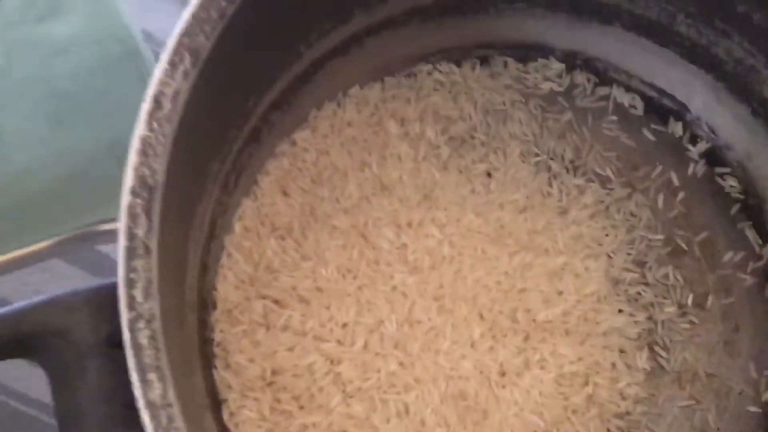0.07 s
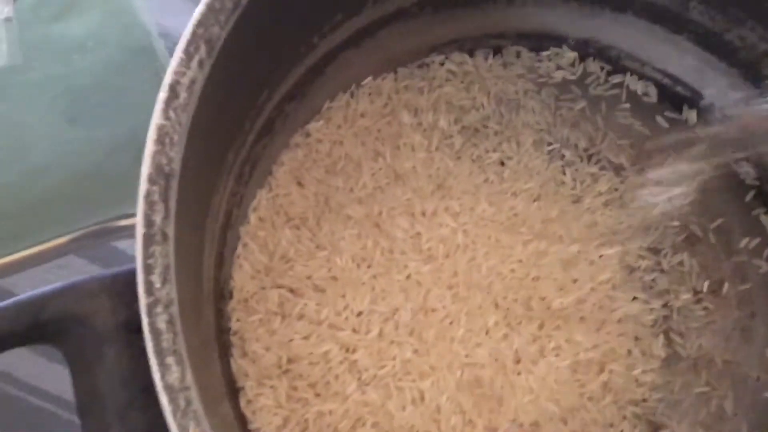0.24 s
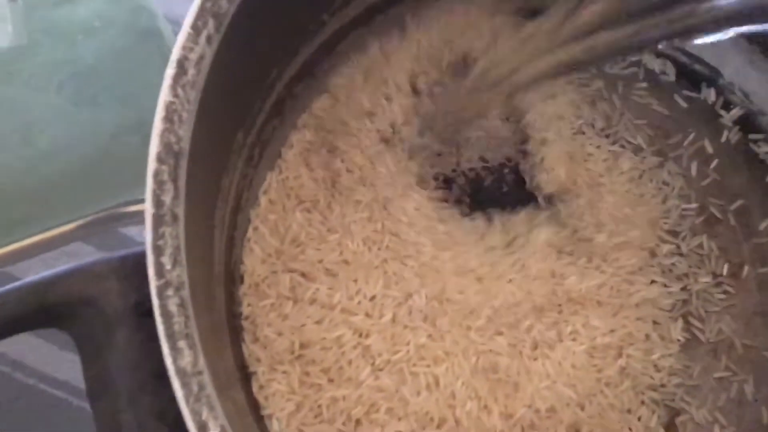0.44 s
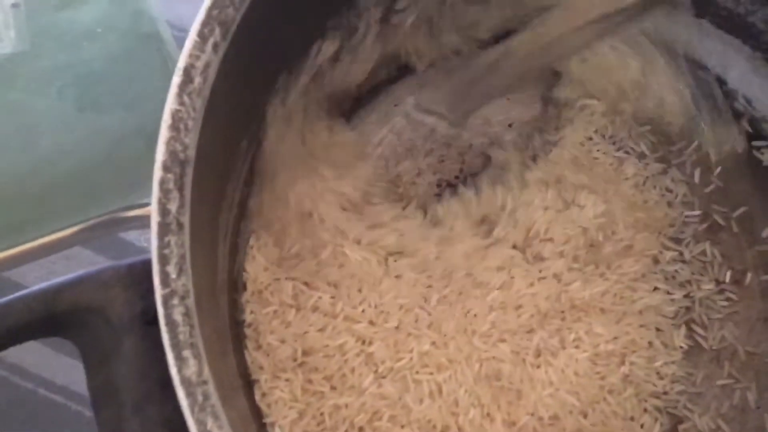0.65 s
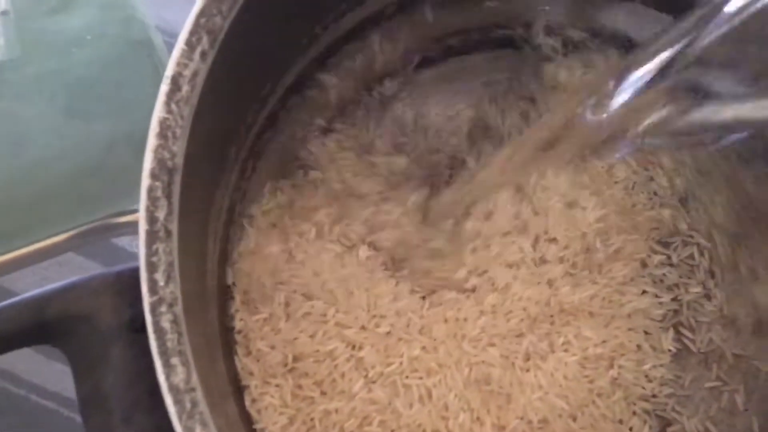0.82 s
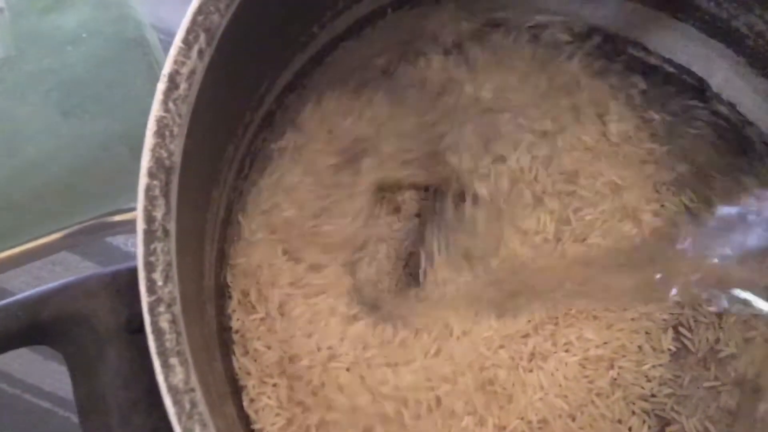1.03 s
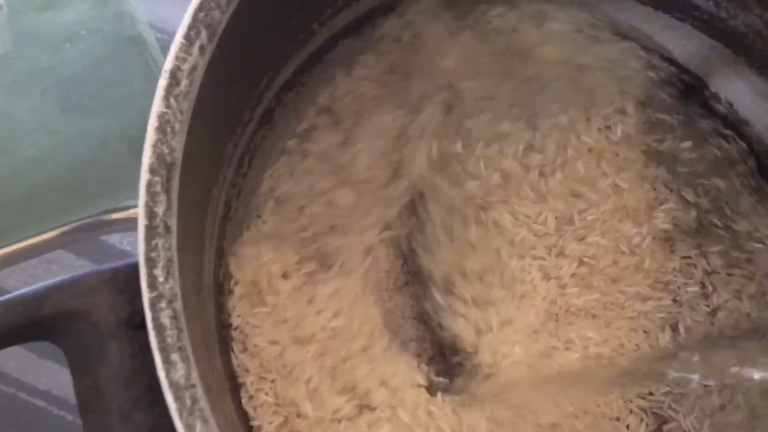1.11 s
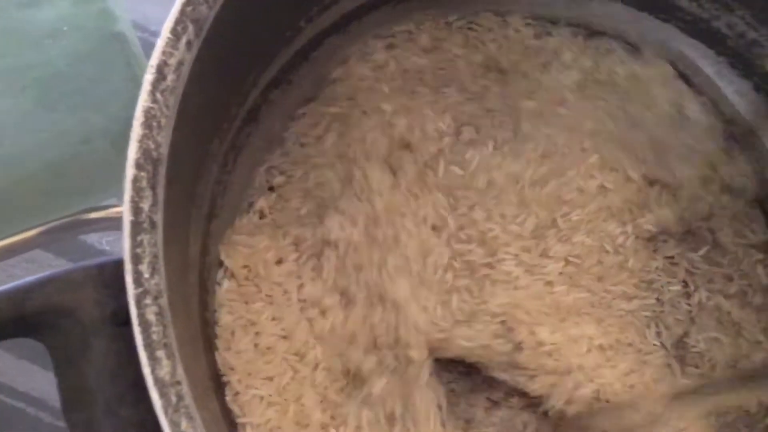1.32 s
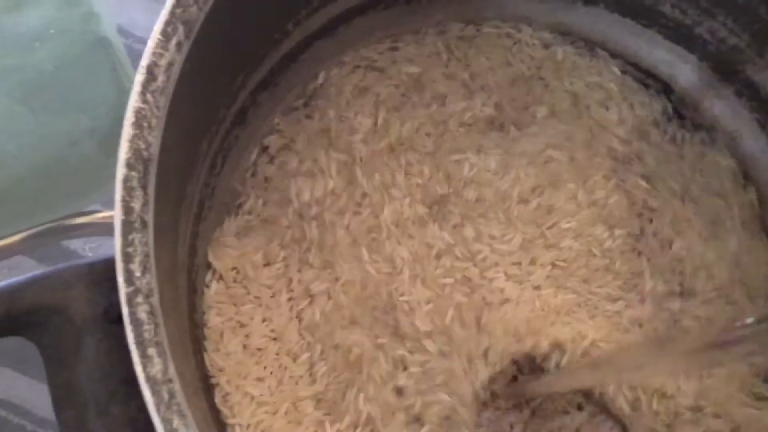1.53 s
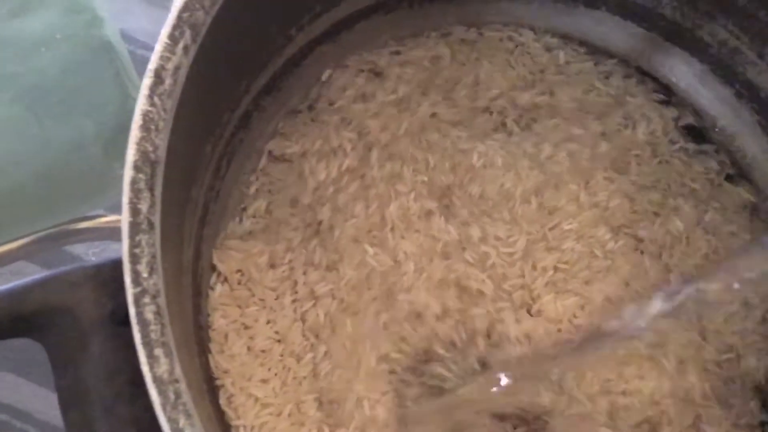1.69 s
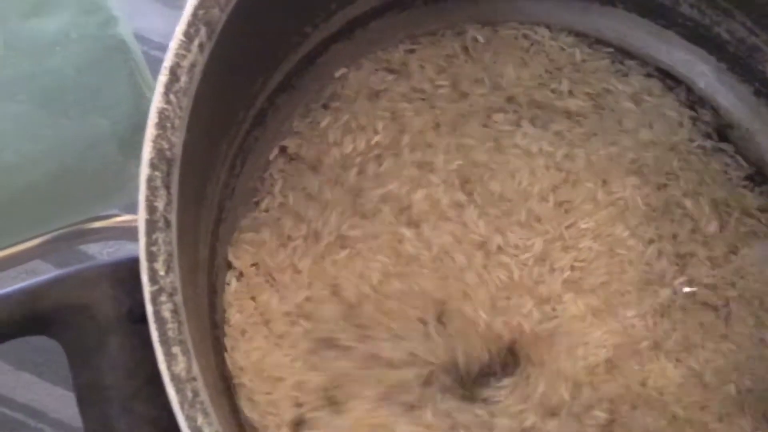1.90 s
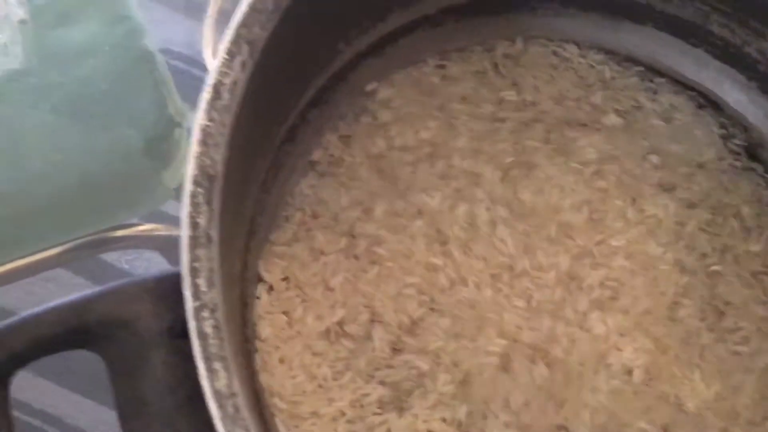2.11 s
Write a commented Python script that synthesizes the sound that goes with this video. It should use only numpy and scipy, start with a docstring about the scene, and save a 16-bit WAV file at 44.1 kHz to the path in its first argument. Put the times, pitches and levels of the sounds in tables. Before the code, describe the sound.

Water pouring onto dry rice in a metal pot, close up in a kitchen. Low appliance hum alone until 0.2 s, then a sharp sizzle on metal and bright, hissy patter, strongest around 0.3-0.6 s. It swells again near 1 s with watery slopping, thins from 1.25 s into bubbles and soft glugs, gives final plinks and drips around 1.8-1.9 s, leaving hum and very faint wet crackle.

```python
"""An appliance hums in a kitchen, made of wavering sine tones over soft filtered noise.
Water is poured onto dry rice in a metal pot close by: the first of it sizzles on bare metal (quick clicks).
It digs into the rice: clicks make patter and spray, rising tones make bubbles, and the pot rings along.
Air gulps (bands of noise), big bubbles glug (sinking tones) and water slops in the hollow (filtered clicks).
The pour thins to last drops (bursts of noise), leaving the wet rice crackling faintly (tiny clicks)."""
import sys
import numpy as np
from scipy import signal
from scipy.fft import rfft, irfft
from scipy.io import wavfile

SR = 44100
rng = np.random.default_rng(int(sys.argv[2]) if len(sys.argv) > 2 else 0)


def digitize_waveform(pressure):
    """Quantize a signal to 16-bit integers and store it at the path in sys.argv[1].

    Rows of a 2-D input are taken as channels; values are limited to [-1, 1].
    """
    field = np.atleast_2d(pressure).T
    bounded = np.clip(field, -1, 1)
    quanta = np.round(bounded * 32767).astype(np.int16)
    wavfile.write(sys.argv[1], SR, quanta)


N = 94815
T = np.arange(N) / SR

# how the pour changes, before the pot rings: time_s, patter_db, spray_db, bubbling_db
POUR = [(.216, -89, -90, -81), (0.219, -51.5, -46, -72), (0.251, -42.5, -42.5, -65),
        (.30, -39.5, -41.5, -57), (0.333, -33.5, -38.5, -43), (.40, -39.5, -39.5, -42),
        (.53, -37.5, -43, -43.5), (.61, -40, -43.5, -39.5), (.67, -44.5, -47, -41),
        (.73, -39.5, -46.5, -43.5), (.85, -39.5, -50.5, -46), (.95, -36, -40, -42.5),
        (1.12, -38, -42.5, -48.5), (1.24, -43, -48, -47.5), (1.42, -45.5, -53.5, -42),
        (1.58, -49.5, -56.5, -45), (1.73, -56, -56.5, -44), (1.822, -61, -54.5, -43.5),
        (1.87, -46.5, -67, -64), (1.92, -63.5, -69.5, -70), (2.04, -78, -78, -77)]
# tone colours of the pour, only their shape counts: pitch_hz, relative_level_db
PATTER_COLOUR = [(300, -44.5), (650, -21.5), (950, -22), (1550, -7), (2700, -5.5), (3800, -1.5),
                 (5200, -0.5), (7000, -6), (9000, -12.5), (11000, -19), (16000, -13)]
SPRAY_COLOUR = [(1000, -51), (4000, -16), (7000, 3), (9200, 7.5), (10000, 3), (13000, 2.5), (16000, -9.5)]
BUBBLING_COLOUR = [(400, -51.5), (850, -13.5), (1100, -9), (1700, -3.5), (2800, -2.5), (3800, -0.5),
                   (5500, -6.5), (9000, -6.5), (16000, -14)]
# tone colour of the stream on bare metal: pitch_hz, relative_level_db
SIZZLE_COLOUR = [(2500, -28.5), (4000, -11), (4750, 1), (5400, -5), (6500, -9.5), (10000, -19.5)]
SIZZLE_AT_S, SIZZLE_WIDTH_S, SIZZLE_DB = 0.27, 0.032, -37.5
# resonances of the pot: pitch_hz, t60_s (time to fade by 60 dB)
POT_RINGS = [(1520, .07), (1745, .08), (1990, .05), (2475, .05), (3045, .05), (3862, .12), (4769, .12),
             (5670, .08), (8950, .04)]
POT_DB = -2.5
# single loud bubbles: start_s, starting_pitch_hz, peak_db
LOUD_BUBBLES = [(.502, 4060, -27.5), (.531, 5800, -32), (0.538, 2590, -31), (0.5436, 3870, -24),
                (.5452, 5060, -31), (.568, 1254, -36), (.594, 3000, -29), (.679, 1510, -31),
                (.6855, 1966, -31.5), (.716, 4160, -29.5), (0.7366, 4630, -28), (0.775, 4480, -27),
                (.9285, 1034, -34), (1.088, 2396, -34), (1.2424, 1115, -36.5), (1.256, 2014, -30.5),
                (1.3895, 1770, -30.5), (1.3935, 1134, -37.5), (1.3966, 3520, -30.5), (1.537, 2360, -35.5),
                (1.6018, 3300, -33), (1.665, 3000, -36), (1.7801, 4660, -25), (1.7827, 5360, -31.5),
                (1.7934, 1770, -29), (1.8179, 3870, -30.5), (1.872, 2366, -38.5)]
# small bubbles die sooner: t60 at 1 kHz, and the power of pitch that shortens it
BUBBLE_T60_S, BUBBLE_SLOPE = 0.034, 0.64
# the pitch climbs by twice the glide, as a share of itself, over one t60
BUBBLE_RISE_S, BUBBLE_GLIDE = 0.00095, 0.081
# weaker bubbles after each loud one: longest delay, widest detuning either way, level next to it
CLUSTER_S, CLUSTER_OCTAVES, CLUSTER_DB = 0.008, 0.27, -11.5
# drops that slap the water: start_s, peak_db
DROPS = [(0.2233, -36), (.316, -28), (.4415, -29.5), (0.571, -36), (0.738, -31.5), (1.012, -24),
         (1.394, -30.5), (1.733, -29.5), (1.774, -26.5), (1.7798, -24), (1.816, -32), (1.8367, -40),
         (1.8504, -34.5), (1.8655, -33.5), (1.872, -43), (1.891, -39.5)]
# tone colour of a drop: pitch_hz, relative_level_db
DROP_COLOUR = [(500, -7), (3000, -17), (5300, 5.5), (9500, -2), (16000, -25)]
DROP_RISE_S, DROP_T60_S = 0.00084, 0.017
# air pockets gulping in the rice: start_s, length_s, pitch_hz, level_db
GULPS = [(0.334, 0.059, 720, -51.5), (0.41, 0.019, 780, -52), (0.45, 0.0092, 730, -50),
         (0.493, .04, 680, -58), (0.581, 0.049, 603, -54), (0.66, 0.029, 626, -56),
         (0.734, 0.055, 760, -53.5), (0.783, 0.035, 786, -48.5), (0.924, 0.055, 860, -54.5),
         (1.398, 0.012, 610, -46), (1.539, 0.38, 706, -63.5), (1.665, 0.042, 560, -54)]
GULP_OCTAVES, GULP_RISE_S = 0.34, 0.0012
# large bubbles under the rice: start_s, starting_pitch_hz, peak_db (before rise and fade)
GLUGS = [(1.397, 287.7, -35), (1.406, 1590, -39.5), (1.409, 1090, -35.5), (1.435, 730, -41.5),
         (1.447, 350, -46.5), (1.667, 660, -40.5), (1.695, 600, -41), (1.778, 1070, -40), (1.797, 810, -43)]
GLUG_RISE_S, GLUG_T60_S, GLUG_SAG_PER_S = 0.003, 0.049, 4.5  # t60 at 1 kHz
# loudness of the hollow that the stream digs: time_s, level_db
HOLLOW_LEVEL = [(.88, -82), (.94, -57.5), (1.24, -48.5), (1.3, -62.5), (1.8, -54.5), (1.9, -88)]
# tone colour of the hollow, close to one pitch: pitch_hz, relative_level_db
HOLLOW_COLOUR = [(750, -40.5), (1070, 1.5), (1450, -23)]
# tone colour of wet rice crackling: pitch_hz, relative_level_db
CRACKLE_COLOUR = [(500, -27), (2000, -16), (5300, 6), (8000, 1), (16000, -6)]
CRACKLE_DB, SOAK_S = -68, 1.1
# how long the kitchen rings at each pitch: pitch_hz, t60_s
ROOM_T60 = [(200, 0.64), (1500, 0.26), (4000, 0.41), (9000, 0.055), (16000, 0.36)]
ROOM_DB = -10.5
# appliance hum: pitch_hz, level_db (rms, before it wavers)
HUM = [(82, -61.5), (119.8, -55.5), (210, -67)]
# tone colour of the quiet room air: pitch_hz, relative_level_db
AIR_COLOUR = [(40, -41), (60, 6), (100, -6.5), (150, -0.5), (200, -6), (360, -13), (500, -22), (1000, -31),
              (2000, -65), (5000, -55), (14000, -73)]
AIR_DB = -58
CUTOFF_HZ = 15850


def amp(db):
    """Turns decibels into a gain."""
    return 10 ** (np.asarray(db) / 20)


def unit(x):
    """Scales a sound to an average (rms) level of 1."""
    return x / np.sqrt(np.mean(x ** 2) + 1e-20)


def read(points, hz):
    """Reads a table between its points, with pitch on a log scale."""
    f, value = np.transpose(points)
    return np.interp(np.log(hz + 1), np.log(f), value)


def fade(t, t60):
    """Dies away evenly, losing 60 dB in t60 seconds."""
    return np.exp(-np.log(1000) * t / t60)


def swell(at_s, width_s):
    """A smooth rise and fall around one moment."""
    return np.exp(-.5 * ((T - at_s) / width_s) ** 2)


def add(mix, s, sound):
    """Mixes a sound in at time s."""
    part = mix[max(round(s * SR), 0):][:len(sound)]
    part += sound[:len(part)]


def colour(x, points, size=4096):
    """Filters a sound to a tone colour, with no sound ahead of its cause."""
    log_gain = np.log(amp(read(points, abs(np.fft.fftfreq(size, 1 / SR)))))
    # the Hilbert transform finds the phase that packs the energy at the start
    spectrum = np.exp(np.conj(signal.hilbert(log_gain)))
    taps = np.fft.ifft(spectrum).real[:size // 2]
    return signal.fftconvolve(x, taps)[:len(x)]


def impacts(per_s, spread_db):
    """Clicks at random moments, of random size and direction."""
    size = amp(spread_db * np.minimum(rng.exponential(1, N), 4))
    direction = rng.choice([-1, 1], N)
    happens = rng.random(N) < per_s / SR
    return size * direction * happens


def flutter(rate_hz, depth_db):
    """Random swings of level, made from noise smoothed to keep its slow part."""
    hz = np.fft.rfftfreq(N, 1 / SR)
    smooth = rfft(rng.standard_normal(N)) / (1 + (hz / rate_hz) ** 2)
    return amp(depth_db * unit(irfft(smooth, N)))


def stream():
    """Many small hits make patter, spray and sizzle, which flutter as the stream breaks up; bubbles join."""
    s, *levels = np.transpose(POUR)
    patter_level, spray_level, bubbling_level = (amp(np.interp(T, s, level)) for level in levels)
    # a weaker spray has fewer hits, down to single droplets; each is made larger to hold the level
    density = np.maximum(spray_level / spray_level.max(), .04)
    patter_density = np.sqrt(density)
    patter_hits = impacts(per_s=6000 * patter_density, spread_db=3.0) / np.sqrt(patter_density)
    patter = patter_level * unit(colour(patter_hits, PATTER_COLOUR))
    spray_hits = impacts(per_s=12000 * density, spread_db=3.5) / np.sqrt(density)
    spray = spray_level * unit(colour(spray_hits, SPRAY_COLOUR))
    bubbling = bubbling_level * unit(colour(swarm(per_s=3500, spread_db=3.0), BUBBLING_COLOUR))
    on_metal = swell(SIZZLE_AT_S, SIZZLE_WIDTH_S) * (T > s[1])
    sizzle_hits = impacts(per_s=3800, spread_db=-3)
    sizzle = amp(SIZZLE_DB) * on_metal * unit(colour(sizzle_hits, SIZZLE_COLOUR))
    return (patter + spray + sizzle) * flutter(rate_hz=49, depth_db=1.14) + bubbling


def swarm(per_s, spread_db, count=120):
    """Many bubbles at once: high pitches are more common, and each pitch gets its own ring length."""
    out, pitches = np.zeros(N), np.geomspace(800, 12000, count)
    for hz in pitches:
        ring = bubble(hz, stretch=rng.uniform(0.79, 2.63))
        starts = impacts(per_s * hz / pitches.sum(), spread_db)
        out += signal.oaconvolve(starts, ring)[:N]
    return out


def bubble(hz, stretch=1):
    """A bubble of air in water rings briefly and rises in pitch."""
    t60 = stretch * BUBBLE_T60_S * (1000 / hz) ** BUBBLE_SLOPE
    t = np.arange(0, t60, 1 / SR)
    shape = np.minimum(t / BUBBLE_RISE_S, 1) * fade(t, t60)
    turns = hz * t * (1 + BUBBLE_GLIDE * t / t60)
    return shape / shape.max() * np.sin(2 * np.pi * turns)


def pot(x):
    """The metal pot rings at its own pitches when the sound x excites it."""
    t = T[:SR // 4]
    ring = np.zeros(len(t))
    for hz, t60 in POT_RINGS:
        shape = fade(t, t60)
        ring += 2 * shape / shape.sum() * np.cos(2 * np.pi * hz * t)
    return amp(POT_DB) * signal.fftconvolve(x, ring)[:N]


def loud_bubbles(count=3):
    """Each loud bubble breaks up into a few weaker ones that ring more briefly."""
    out = np.zeros(N)
    for s, hz, db in LOUD_BUBBLES:
        add(out, s, amp(db) * bubble(hz))
        for late, detune in rng.random((count, 2)):
            small_hz = hz * 2 ** (CLUSTER_OCTAVES * (2 * detune - 1))
            small = bubble(small_hz, stretch=0.38)
            add(out, s + late * CLUSTER_S, amp(db + CLUSTER_DB) * small)
    return out


def drops():
    """A drop slaps the water: a short burst of filtered noise."""
    out, t = np.zeros(N), T[:SR // 20]
    shape = np.minimum(t / DROP_RISE_S, 1) * fade(t, DROP_T60_S)
    for s, db in DROPS:
        slap = colour(rng.standard_normal(len(t)) * shape, DROP_COLOUR)
        add(out, s, amp(db) * slap / abs(slap).max())
    return out


def gulps():
    """The stream drags air under: low gurgles, blurred by the rice into narrow bands of noise."""
    out, t = np.zeros(N), T[:SR // 4]
    f = np.fft.rfftfreq(len(t), 1 / SR) + 1
    for s, length, hz, db in GULPS:
        band = np.exp(-.5 * (np.log2(f / hz) / GULP_OCTAVES) ** 2)
        shape = np.minimum(t / GULP_RISE_S, 1) * np.exp(-(t / length) ** 2)
        gulp = shape * irfft(rfft(rng.standard_normal(len(t))) * band, len(t))
        # the level counts while the gulp is at its fullest
        add(out, s, amp(db) * unit(gulp) * np.sqrt(np.mean(shape ** 2)))
    return out


def glugs():
    """Large bubbles ring, the deepest longest, while the water closes over them and lowers their pitch."""
    out, t = np.zeros(N), T[:SR // 6]
    for s, hz, db in GLUGS:
        t60 = GLUG_T60_S * (1000 / hz) ** BUBBLE_SLOPE
        shape = np.minimum(t / GLUG_RISE_S, 1) * fade(t, t60)
        turns = np.cumsum(hz * np.exp(-GLUG_SAG_PER_S * t)) / SR
        add(out, s, amp(db) * shape * np.sin(2 * np.pi * turns))
    return out


def hollow():
    """Water slops in the hollow under the stream: clicks filtered to nearly one pitch."""
    level = amp(np.interp(T, *np.transpose(HOLLOW_LEVEL)))
    return level * unit(colour(impacts(per_s=330, spread_db=-2.0), HOLLOW_COLOUR))


def crackle():
    """Tiny pops in the rice grow in level as it soaks, then go on."""
    wet = np.clip((T - POUR[0][0]) / SOAK_S, 0, 1)
    pops = impacts(per_s=1700, spread_db=5.0)
    return amp(CRACKLE_DB) * wet * unit(colour(pops, CRACKLE_COLOUR))


def kitchen(x):
    """The room answers with a short blurred tail, each pitch dying at its own speed."""
    noise = rng.standard_normal(SR // 2) * (T[:SR // 2] > .003)
    hz, t, bands = signal.stft(noise, SR, nperseg=256)
    tail = signal.istft(bands * fade(t, read(ROOM_T60, hz)[:, None]), SR)[1]
    return signal.fftconvolve(x, tail / np.linalg.norm(tail))[:N]


def background():
    """Wavering appliance hum over quiet room air, which is filtered noise."""
    gain = amp(read(AIR_COLOUR, np.fft.rfftfreq(N, 1 / SR)))
    air = irfft(rfft(rng.standard_normal(N)) * gain, N)
    hum = np.zeros(N)
    for hz, db in HUM:
        tone = np.sin(2 * np.pi * (hz * T + rng.random()))
        hum += amp(db) * flutter(rate_hz=3.8, depth_db=1.66) * tone
    return amp(AIR_DB) * unit(air) + np.sqrt(2) * hum  # root 2 takes a sine from peak to rms level


def scene():
    """Water in the pot, in the kitchen, the same in both channels."""
    pour = stream() + crackle()
    water = amp(-1.69) * pour + pot(pour)
    water = water + loud_bubbles() + drops() + gulps() + glugs() + hollow()
    mono = water + amp(ROOM_DB) * kitchen(water) + background()
    return np.array([mono, mono])


def record(dry):
    """The recorder's band limit: a steep filter removes the highest treble."""
    taps = signal.firwin(611, CUTOFF_HZ, window=("kaiser", 9), fs=SR)
    return signal.oaconvolve(dry, taps[None], "same", axes=1)


dry = scene()
out = record(dry)
digitize_waveform(out)
```